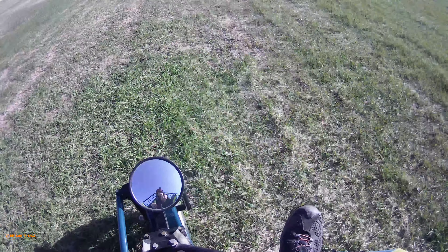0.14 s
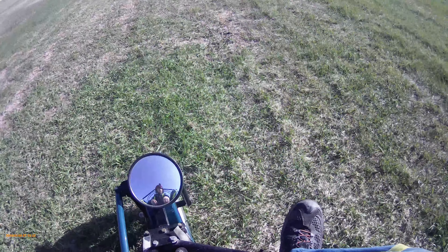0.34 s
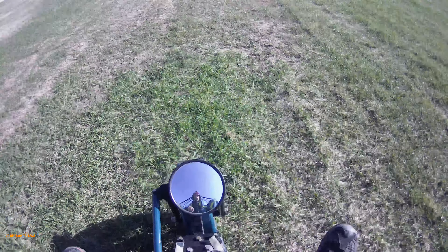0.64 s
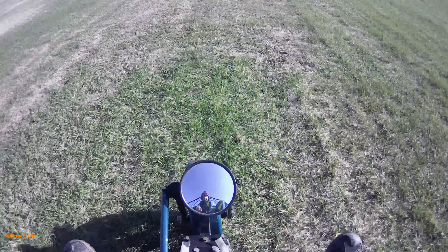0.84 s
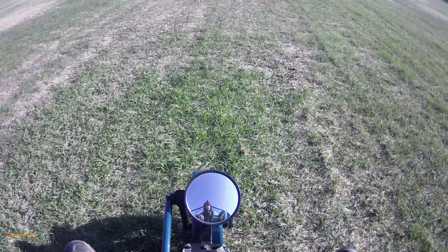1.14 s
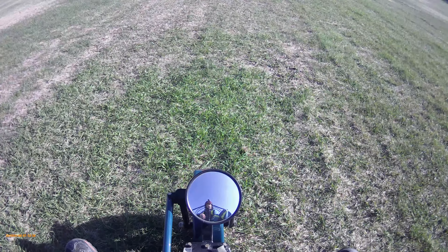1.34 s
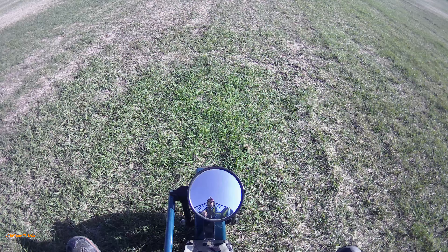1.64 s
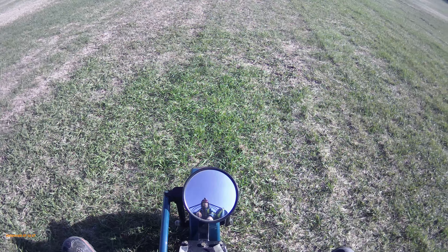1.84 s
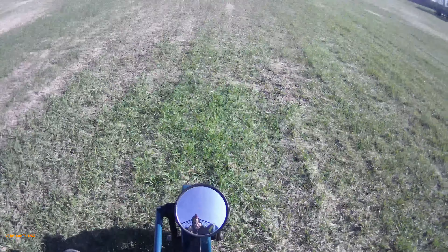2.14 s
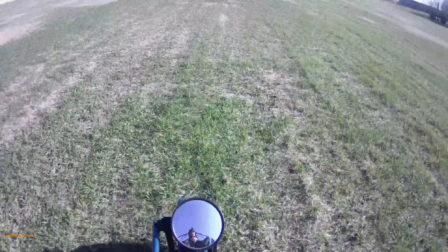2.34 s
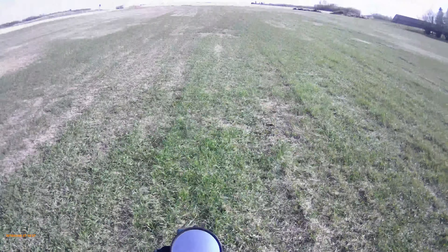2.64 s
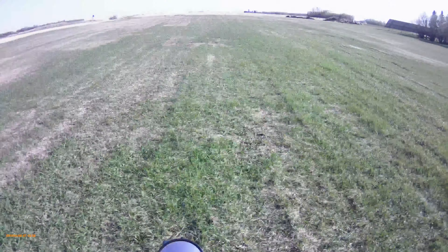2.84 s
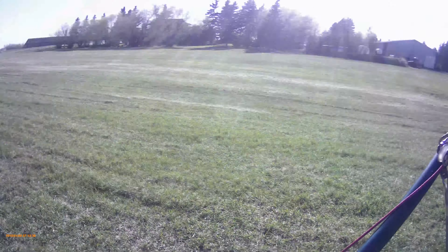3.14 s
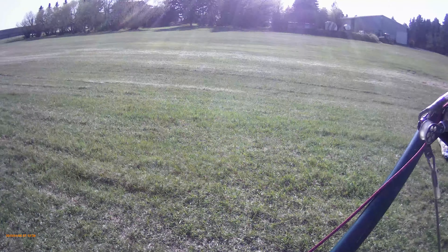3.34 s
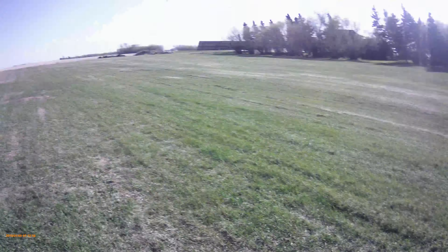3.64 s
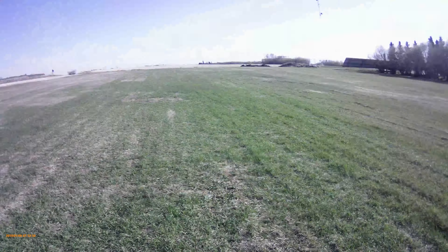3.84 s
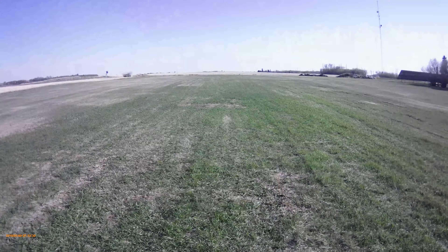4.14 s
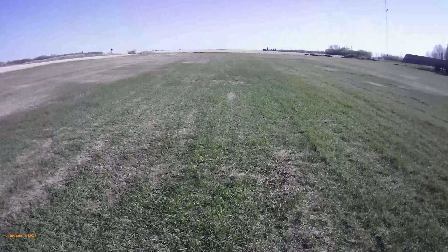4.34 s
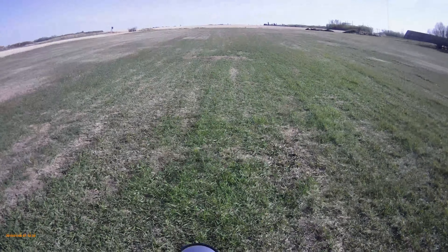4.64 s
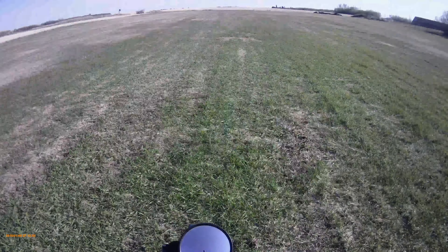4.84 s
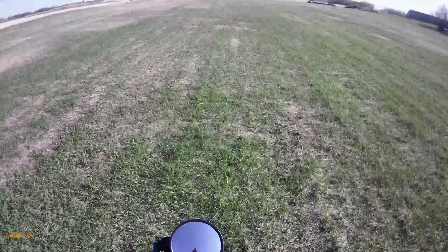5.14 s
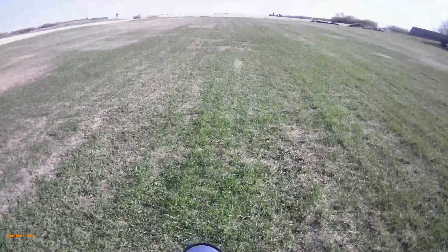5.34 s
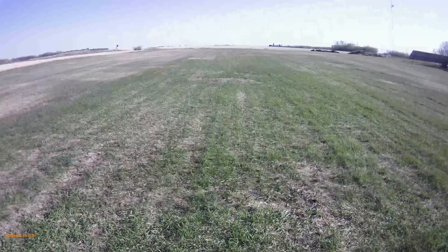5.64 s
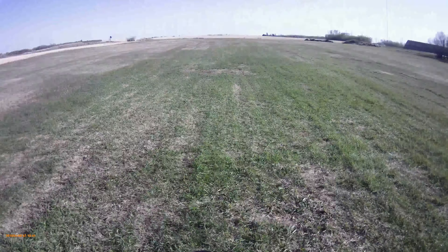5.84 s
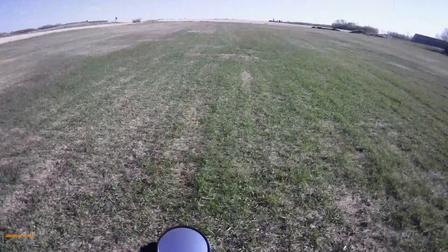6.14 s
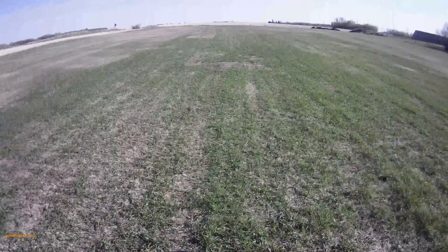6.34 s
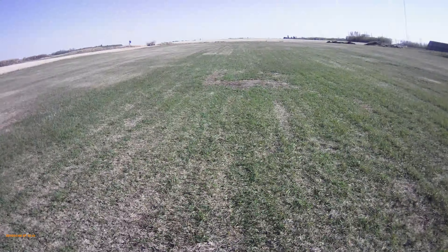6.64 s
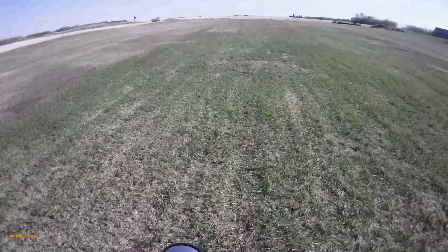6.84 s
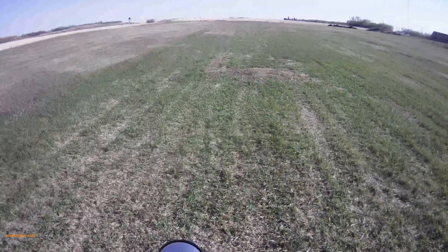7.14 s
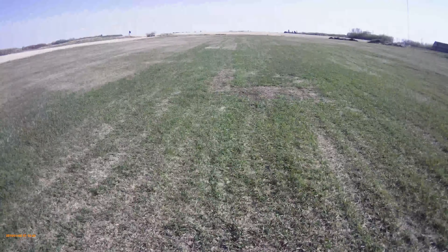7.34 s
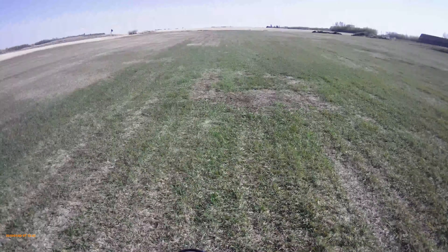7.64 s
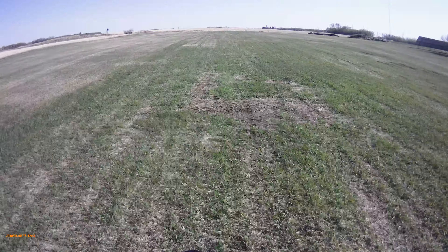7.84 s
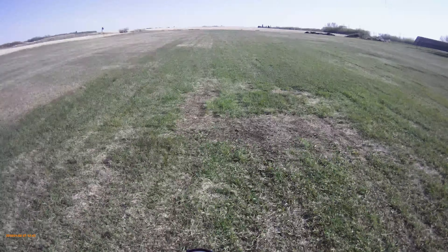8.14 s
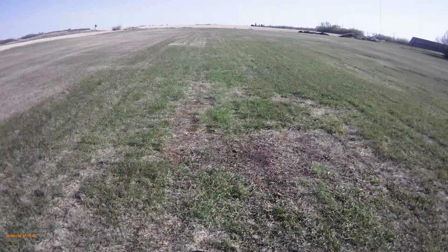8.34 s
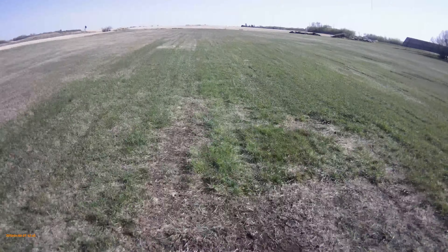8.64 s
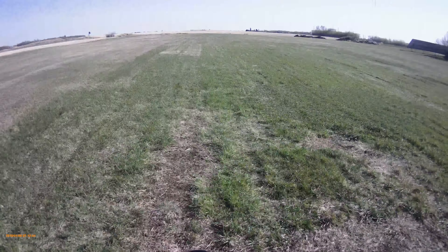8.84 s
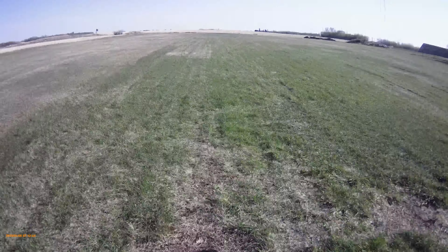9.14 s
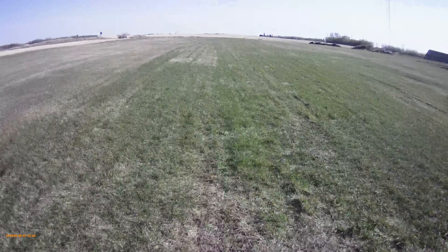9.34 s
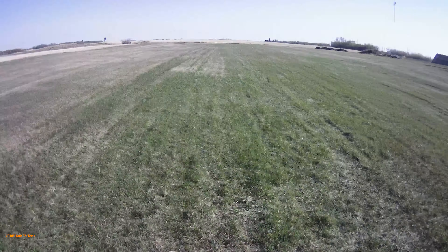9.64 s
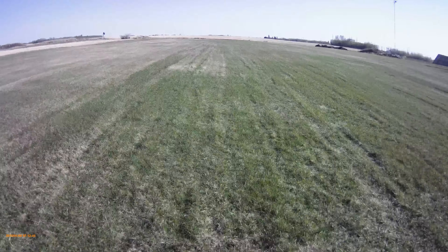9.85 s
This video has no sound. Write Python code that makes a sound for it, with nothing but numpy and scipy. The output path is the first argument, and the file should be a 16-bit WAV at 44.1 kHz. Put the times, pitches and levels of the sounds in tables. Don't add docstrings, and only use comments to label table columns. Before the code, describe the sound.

Close behind the pilot, a sputtering two-stroke idle blips, climbs steeply in pitch and roars on with a hissing, blade-chopped propeller.

```python
import sys
import numpy as np
from scipy import signal
from scipy.fft import rfft, irfft, next_fast_len
from scipy.io import wavfile
from scipy.ndimage import uniform_filter1d

SR = 44100
rng = np.random.default_rng(int(sys.argv[2]) if len(sys.argv) > 2 else 0)


def ratio_of_db(decibels):
    return 10 ** (np.asarray(decibels, float) / 20)


def wrap_up_sound(samples):
    columns = np.atleast_2d(samples).T
    tamed = np.clip(columns, -1, 1)
    steps = np.round(tamed * 32767).astype(np.int16)
    wavfile.write(sys.argv[1], SR, steps)


N = 440559
TIME = np.arange(N) / SR
STEP = 32
BLADES_PER_TURN = 3 / 2.58
FULL_CRANK_HZ = 99.6
LOPE_END_S = 2.72


def shape(table, hz):
    at_hz, db = np.transpose(table)
    wide_hz = np.r_[at_hz[0] / 2, at_hz, at_hz[-1] * 1.1]
    return np.interp(np.log(hz), np.log(wide_hz), np.r_[db[0] - 40, db, db[-1] - 40])


def rings_db(rings, hz):
    return sum(top_db / (1 + (2 * (hz - f) / width_hz) ** 2) for f, width_hz, top_db in rings)


def coloured(x, table, rings=()):
    size = next_fast_len(N)
    hz = np.maximum(np.arange(size // 2 + 1) * SR / size, 1)
    db = shape(table, hz) + rings_db(rings, hz)
    y = irfft(rfft(x, size) * ratio_of_db(db), size)[:N]
    return y / np.std(y)


def walk(rate_hz, step=1):
    k = int(SR / step / rate_hz)
    held = np.repeat(rng.standard_normal(int(N / SR * rate_hz) + 3), k + 1)
    slewed = uniform_filter1d(uniform_filter1d(held, k), k)
    return 1.3 * slewed[:-(-N // step)]


def tone(turns, db, waver_db, rate_hz):
    gain = np.repeat(ratio_of_db(db[::STEP] + waver_db * walk(rate_hz, STEP)), STEP)[:N]
    return np.sqrt(2) * gain * np.sin(2 * np.pi * (turns + rng.random()))


def puffs(turns, depth, sharp):
    return np.exp(-sharp * (turns % 1)) * depth + 1 - depth / (1 + sharp)


def gesture(start_s, rise_s, hold_s, fall_s):
    return np.interp(TIME, np.cumsum([start_s, rise_s, hold_s, fall_s]), [0, 1, 1, 0])


# time in seconds, rate in Hz.
SPEED = [(0.0, 67.2), (0.5, 67.9), (1.0, 66.65), (1.65, 66.33), (2.2, 67.64), (2.53, 66.6), (2.82, 78.26),
         (3.45, 77.3), (3.61, 79.4), (4.3, 133.9), (4.8, 166.3), (5.05, 184.3), (5.35, 195.1), (5.7, 197.9),
         (7.2, 199.2), (7.8, 198.7), (8.8, 200), (9.99, 199)]


def crank_speed(lift):
    sag_hz, lag_s = 14, .2
    follow = 1 / (lag_s * SR)
    sag = sag_hz * signal.lfilter([follow], [1, follow - 1], lift)
    firing_hz = np.interp(TIME, *np.transpose(SPEED)) - sag
    return uniform_filter1d(firing_hz, SR // 10) / 2


# time in seconds, level in dB.
ROAR = [(0, -53.5), (.4, -54), (2.3, -53.5), (2.5, -52), (2.72, -46), (2.9, -48.5), (3.4, -47.5),
        (3.8, -43.5), (4.15, -37), (4.3, -36.5), (4.75, -30.5), (5.6, -25.5), (6.5, -26.5), (7.9, -28),
        (8.2, -27), (8.5, -28), (9.3, -28.5), (9.99, -28)]


def engine_level():
    return np.interp(TIME, *np.transpose(ROAR))


# time in seconds, running count, strength 0-1.
LOPE = [(.009, 0, .4), (.062, 1, 1), (.138, 2, .8), (.19, 3, .45), (.263, 4, 1), (.329, 5, .6),
        (.376, 6, .35), (.58, 9, .6), (.651, 10, .75), (.828, 13, .75), (.92, 14, .5), (1.127, 17, .6),
        (1.3, 20, .75), (1.378, 21, .35), (1.473, 22, .5), (1.522, 23, .7), (1.611, 24, .7),
        (1.655, 25, .3), (1.733, 26, .75), (1.863, 28, .7), (1.914, 29, .75), (1.989, 30, .7),
        (2.092, 32, .7), (2.216, 34, .8), (2.297, 35, .5), (2.346, 36, .35), (2.42, 37, .5),
        (2.649, 41, .4)]


def lope(width_s, rest):
    s, count, strength = np.transpose(LOPE)
    every = np.arange(count[-1] + 1)
    swell = np.zeros(N)
    for at_s, size in zip(np.interp(every, count, s), np.interp(every, count, strength)):
        first = max(int((at_s - 4 * width_s) * SR), 0)
        near = slice(first, int((at_s + 4 * width_s) * SR))
        swell[near] += size * np.exp(-.5 * ((TIME[near] - at_s) / width_s) ** 2)
    even = np.clip((TIME - LOPE_END_S) * 20, 0, 1)
    mean = rest + swell[TIME < LOPE_END_S].mean()
    return (1 - even) * (rest + swell) / mean + even


# frequency in Hz, level in dB per Hz.
BUFFET = [(15, -14.5), (30, -17), (48, -2.5), (70, -12.5), (110, -2.5)]


def buffeting(revs):
    full_db, idle_rise_db = -74.5, 8
    db = full_db + idle_rise_db * 1.5 * (1 - revs)
    return coloured(rng.standard_normal(N), BUFFET) * ratio_of_db(db + 3.5 * walk(5))


# frequency in Hz, level in dB per Hz.
AIR = [(2940, -29), (5000, -1.5), (5730, 0), (6390, -4.5), (7470, -6.5), (9100, -18), (10000, -15),
       (10700, -35), (13900, -56), (22000, -120)]


def thin_air(chop, firing, revs, climb, look, loping):
    db = -25 - 2.5 * climb + 5.5 * look
    noise = rng.standard_normal(N) * chop * firing ** (1.1 * (1 - revs).clip(0))
    return coloured(noise, AIR) * ratio_of_db(db + 1.0 + .4 * walk(11)) * loping ** -.3


# frequency in Hz, level in dB per Hz.
CASE_HIGH = [(1410, -17.5), (2400, 2.5), (2660, -7), (2790, -11), (3130, -0.5), (3320, 3.5), (3710, 0.5),
             (4310, -7), (5200, -15.5), (6760, -42.5), (11400, -120)]
# frequency in Hz, width in Hz, gain in dB.
WALLS = [(1010, 73, 5.5), (1300, 85, 5.5), (1504, 130, 2), (1680, 74, 3), (2050, 51, 0.5), (3166, 220, 3),
         (3710, 240, 2.5)]


def blade_hiss(chop, firing, revs, climb, look, loping):
    db = -14.5 - 2.2 * climb + 2 * look
    noise = rng.standard_normal(N) * chop * firing ** (0.79 * (1 - revs).clip(0))
    return coloured(noise, CASE_HIGH, WALLS) * ratio_of_db(db + 3.0 + .5 * walk(11)) * loping ** .6


# frequency in Hz, level in dB per Hz.
CASE_LOW = [(40, -59), (90, -37), (150, -25), (260, -20.5), (400, -11), (520, -16), (700, -14.5),
            (950, -7.5), (1150, -2.5), (1350, 1), (1750, 1), (1950, -6), (2150, -0.5), (2400, -15)]


def low_roar(chop, firing, lift):
    noise = rng.standard_normal(N) * firing * chop ** 0.82
    return coloured(noise, CASE_LOW, WALLS) * ratio_of_db(-1.5 * lift + 0.78 * walk(15))


def sweep_db(multiple, crank_hz, share):
    step = 64
    db = shape(CASE_LOW, multiple * crank_hz[::step]) - shape(CASE_LOW, multiple * FULL_CRANK_HZ)
    return share * np.repeat(db, step)[:N]


# frequency in Hz, level in dB per Hz.
RAGGED = [(80, -13.5), (100, -22), (120, -16.5), (165, -8.5), (205, 5), (270, -6), (400, 8), (470, 4.5),
          (560, 3.5), (750, 0.5), (1000, 3)]


def ragged_firings(turns, revs, climb, look, rolled_s, loping):
    db = -4.5 - 1.5 * climb - 3 * look + 1.72 * rolled_s
    noise = rng.standard_normal(N) * puffs(2 * turns, depth=1.0, sharp=12.0)
    return coloured(noise, RAGGED) * ratio_of_db(db - 12 * revs + 4 + .8 * walk(5)) * loping ** -.6


# multiple of the blade rate, level in dB.
BLADES = [(1, -15.5), (2, -8.5), (3, -10.5), (4, 1), (5, -6.5), (6, -16), (7, -7.5), (8, -8.5), (9, -4),
          (10, -3), (11, 2.5), (12, -18.5), (13, -12), (14, -4.5), (15, -4), (16, -6.5), (17, -8.5),
          (18, -3.5)]


def propeller(turns, crank_hz, lift, rolled_s):
    idle_db, full_db, db_per_octave = -68, -41, 50.5
    driven_db = full_db + db_per_octave * np.log2(crank_hz / FULL_CRANK_HZ) - 18 * lift + 1.31 * rolled_s
    db = 20 * np.log10(ratio_of_db(idle_db) + ratio_of_db(driven_db))
    tones = np.zeros(N)
    for k, k_db in BLADES:
        multiple = k * BLADES_PER_TURN
        level_db = db + k_db + sweep_db(multiple, crank_hz, 0.56)
        tones += tone(multiple * turns, level_db, waver_db=2.5, rate_hz=8)
    return tones


# multiple of the crank rate, level over the roar in dB.
CRANK = [(9, -18), (11, -23), (13, -12.5), (15, -11.5), (16, -15), (17, -23), (18, -12), (19, -20.5),
         (20, -26.5), (21, -20.5), (22, -17.5)]


def upper_tones(loose, crank_hz, roar_db, lift, climb):
    upper_db = roar_db + 2 * lift + 0.5 * climb
    return sum(tone(k * loose, upper_db + db + sweep_db(k, crank_hz, 1.0), waver_db=0.5, rate_hz=7)
               for k, db in CRANK)


# frequency in Hz, gain in dB.
PIPE = [(35, -26), (60, -15), (85, -35), (100, -22.5), (205, -21), (240, 6), (265, -14), (300, -16),
        (340, -14.5), (400, -4.5), (470, -2.5), (500, -15), (560, -13.5), (700, -9.5)]


def odd_tones(loose, crank_hz, roar_db, lift, climb):
    odd_db = roar_db - 12.5 - 3 * lift + 3 * climb
    return sum(tone(k * loose, odd_db + shape(PIPE, k * crank_hz), waver_db=2.0, rate_hz=8.8)
               for k in (1, 3, 5, 7))


# frequency in Hz, gain in dB.
MANIFOLD = [(60, -26), (118, -11), (170, -11.5), (215, -2), (330, -6), (425, 1), (580, -10), (1450, -12.5)]
# frequency in Hz, width in Hz, gain in dB.
DEAD_SPOTS = [(283, 30, -11), (342, 17, -5.5), (459, 43, 2.5), (510, 24, -14.5), (647, 117, -9.5),
              (1190, 90, -14.5)]


def manifold_db(hz):
    hz = hz[::STEP]
    return np.repeat(shape(MANIFOLD, hz) + rings_db(DEAD_SPOTS, hz), STEP)[:N]


# multiple of the firing rate, level over the roar in dB, extra at light load in dB,
# extra at idle in dB, change when the throttle lifts in dB.
FIRING = [(1, -3.5, 4, -10, -4), (2, -1.5, 0.5, 8, -15), (3, 0, -1.5, 3, 0), (4, -3, 3.5, -0.5, -0.5),
          (5, -4.5, -11, 13, -12), (6, -3, -13.5, 3.5, -8), (7, -6, 1.5, -4, -2)]


def exhaust(turns, crank_hz, roar_db, lift, climb, loping):
    idling = np.clip((37 - crank_hz) / 3, 0, 1)
    light = np.clip((44 - crank_hz) / 4, 0, 1)
    unsteady = idling + lift * (1 - light)
    loose = turns + .02 * unsteady * walk(40)

    def broken():
        return ratio_of_db(-7 * unsteady * walk(35) ** 2)

    tones = np.zeros(N)
    for k, db, light_db, idle_db, lift_db in FIRING:
        level_db = roar_db + db + light_db * light + idle_db * idling + lift_db * lift
        level_db = level_db + manifold_db(2 * k * crank_hz)
        if k <= 2:
            tones += tone(2 * k * turns, level_db, waver_db=0.4, rate_hz=8)
        else:
            tones += tone(2 * k * loose, level_db, waver_db=1.33, rate_hz=8) * broken()
    odd = odd_tones(loose, crank_hz, roar_db, lift, climb) * broken()
    return tones + odd + upper_tones(loose, crank_hz, roar_db, lift, climb) * loping


def scene():
    lift = gesture(start_s=6.05, rise_s=0.07043, hold_s=.09, fall_s=.22)
    ease = 0.48 * gesture(start_s=2.67, rise_s=.13, hold_s=0.089, fall_s=.12)
    look = gesture(start_s=3.08, rise_s=0.14, hold_s=0.39, fall_s=0.24)
    rolled_s = np.maximum(TIME - 8.45, 0)
    crank_hz = crank_speed(lift)
    climb_hz_per_s = np.gradient(2 * crank_hz) * SR
    climb = np.clip(uniform_filter1d(climb_hz_per_s / 70, SR // 4), 0, 1)
    turns = np.cumsum(crank_hz * (1 + .0010 * walk(12))) / SR
    revs = crank_hz / FULL_CRANK_HZ
    roar_db = engine_level()
    loping = lope(width_s=.011, rest=1.05)
    chop = puffs(BLADES_PER_TURN * turns, depth=0.74 * revs ** 1.1, sharp=1.9)
    firing = puffs(2 * turns, depth=0.76, sharp=3.6)
    noise = thin_air(chop, firing, revs, climb, look, loping)
    noise = noise + blade_hiss(chop, firing, revs, climb, look, loping)
    noise = noise + low_roar(chop, firing, lift)
    noise = noise + ragged_firings(turns, revs, climb, look, rolled_s, loping)
    tones = propeller(turns, crank_hz, lift, rolled_s) * loping
    tones = tones + exhaust(turns, crank_hz, roar_db + 0.65 * rolled_s, lift + ease, climb, loping)
    return (buffeting(revs) + ratio_of_db(roar_db) * loping * noise + tones)[None]


def patchy(x, from_hz, full_hz, most, top_hz):
    hz, s, bins = signal.stft(x, SR, window="cosine", nperseg=2048)
    luck = rng.standard_normal((2, len(hz) // 2 + 1, len(s)))
    strips = uniform_filter1d(luck[0], size=3, axis=1) * np.sqrt(3)
    blocks = uniform_filter1d(uniform_filter1d(luck[1], size=2, axis=1), size=6, axis=0) * 2
    rank = np.argsort(np.argsort((strips + blocks).ravel())).reshape(strips.shape) / strips.size
    hz = hz[:, None]
    share = most * np.clip((hz - from_hz) / (full_hz - from_hz), 0, 1) ** 2
    fewer = .4 * np.exp(-((hz - 9800) / 300) ** 2)
    more = .3 * np.exp(-((hz - 8850) / 130) ** 2)
    share = share * (1 - fewer + more)
    level = np.abs(bins[0]).sum(axis=0)
    loud = level > .2 * level.max()
    kept = (np.repeat(rank, 2, axis=0)[:len(hz)] > share) & ~(loud & (hz > top_hz))
    return signal.istft(bins * kept / np.sqrt(1 - share), SR, window="cosine", nperseg=2048)[1][..., :N]


def top_cut(x):
    return signal.sosfilt(signal.butter(12, 10860, fs=SR, output="sos"), x)


def record(dry):
    mix = patchy(dry, from_hz=7000, full_hz=8800, most=.64, top_hz=10590)
    return top_cut(mix)


dry = scene()
out = record(dry)
wrap_up_sound(out)
```